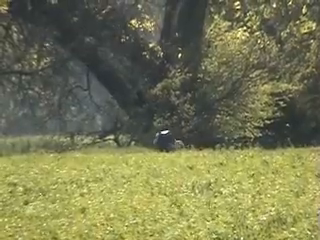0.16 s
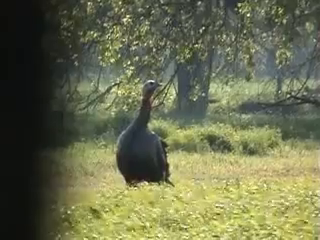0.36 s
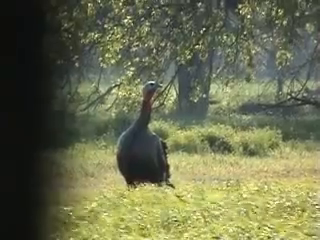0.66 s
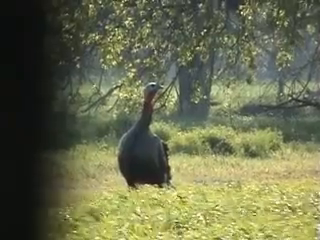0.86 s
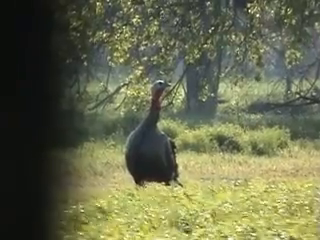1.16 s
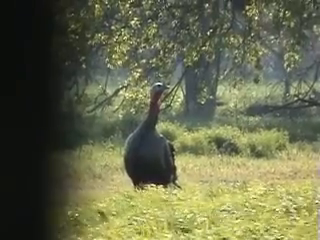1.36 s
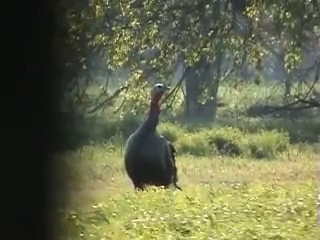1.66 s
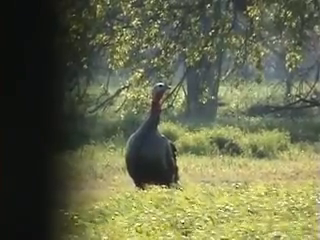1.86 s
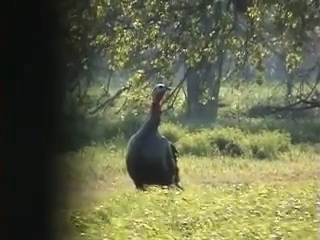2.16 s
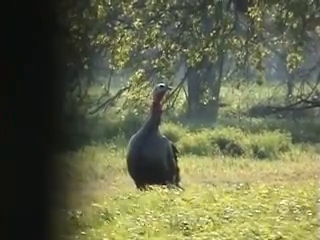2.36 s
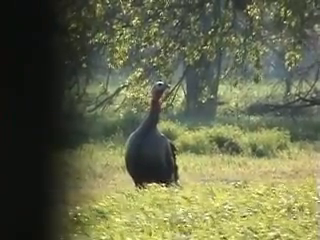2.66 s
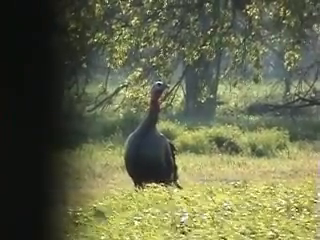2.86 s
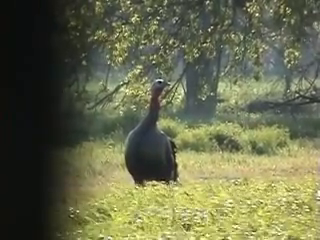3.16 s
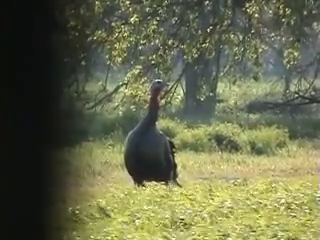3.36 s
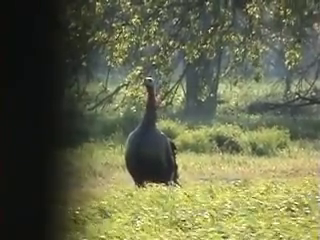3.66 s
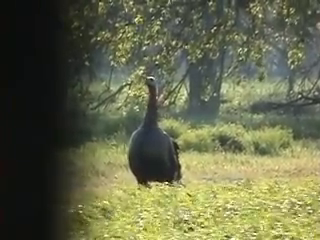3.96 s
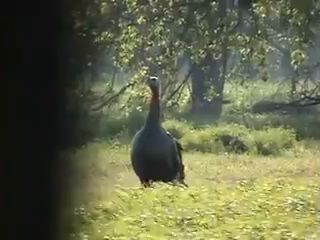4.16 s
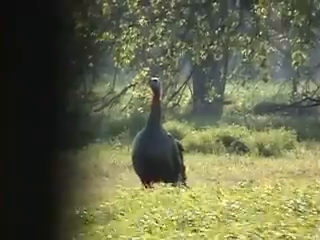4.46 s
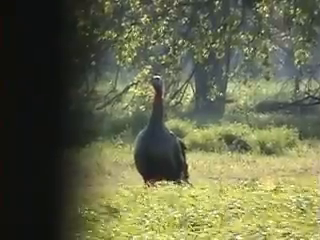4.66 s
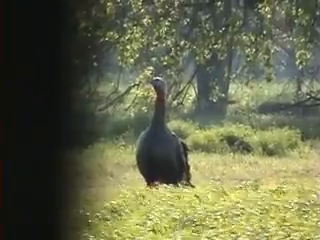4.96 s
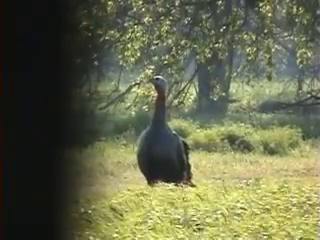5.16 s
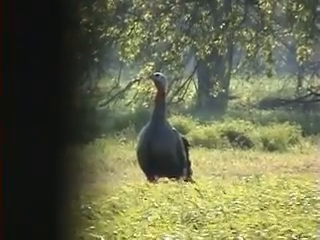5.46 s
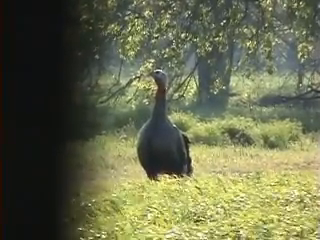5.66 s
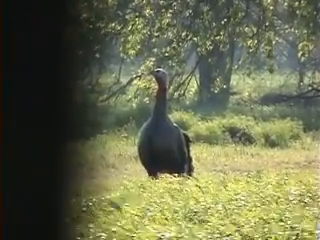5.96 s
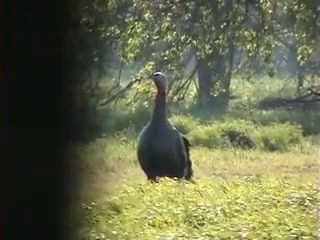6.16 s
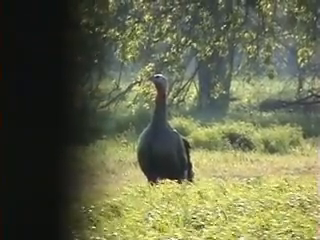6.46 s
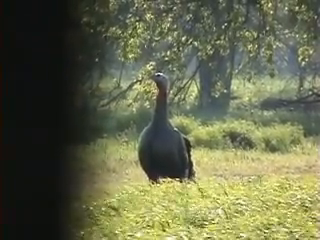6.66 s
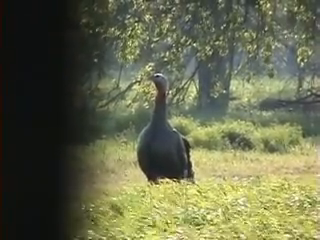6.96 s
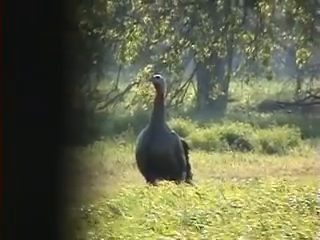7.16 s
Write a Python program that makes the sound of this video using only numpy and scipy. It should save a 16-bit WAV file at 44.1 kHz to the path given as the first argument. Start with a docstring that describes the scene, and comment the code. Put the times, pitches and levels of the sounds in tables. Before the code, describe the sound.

Low camera bumps and rubs, a few clicks, then a turkey's rough stuttering notes break into eight loud reedy two-toned yelps outdoors.

```python
"""In an open field a wild turkey gives three scratchy notes, then eight loud yelps.
Each yelp cracks down from a squeak into a held reedy tone, and cracks up again as it ends.
The calls are gliding partials plus puffs of noise, shaped by throat resonances and scattered by the field.
A handled camera adds noise rubs, decaying low knocks, ringing clicks and the pulses of its faint motor.
Around them lie shaped-noise hiss, outdoor air and breeze, and a few far songbirds whistling in sines."""
import sys
import numpy as np
from scipy import signal
from scipy.fft import rfft, irfft, next_fast_len
from scipy.io import wavfile
from scipy.ndimage import uniform_filter1d, minimum_filter1d

SR = 44100
rng = np.random.default_rng(int(sys.argv[2]) if len(sys.argv) > 2 else 0)


def output_pcm(signal):
    """Save a mono or channel-first signal as 16-bit PCM at the path in sys.argv[1].

    Samples are clipped to [-1, 1] before scaling.
    """
    pcm = np.clip(np.atleast_2d(signal).T, -1, 1) * 32767
    wavfile.write(sys.argv[1], SR, np.round(pcm).astype(np.int16))


N = 322723


def gain_of(db):
    """Decibels to amplitude."""
    return 10 ** (np.asarray(db) / 20)


def evened(x):
    """Scales to rms 1."""
    return x / np.sqrt(np.mean(x ** 2) + 1e-20)


def spectrum_gain(points, hz):
    """A spectrum's gain at the given frequencies, read along a log frequency axis."""
    point_hz, point_db = np.transpose(points)
    return gain_of(np.interp(np.log(hz + 1), np.log(point_hz + 1), point_db))


def level_curve(points):
    """A dB curve over time as a gain for every sample."""
    return gain_of(np.interp(np.arange(N) / SR, *np.transpose(points)))


def add(mix, start_s, sound):
    """Mixes a sound in at its start time, cut off at the end of the scene."""
    part = mix[..., max(0, round(start_s * SR)):][..., :sound.shape[-1]]
    part += sound[..., :part.shape[-1]]


def coloured(x, spectrum):
    """Gives x a spectrum, at rms 1."""
    n = x.shape[-1]
    size = next_fast_len(n + 512)
    gain = spectrum_gain(spectrum, np.fft.rfftfreq(size, 1 / SR))
    return evened(irfft(rfft(x, size) * gain, size)[..., :n])


def wander(n, hz):
    """Smooth random drift of about rms 1, moving mostly slower than hz."""
    size = next_fast_len(n + 1024)
    soft = np.exp(-(np.fft.rfftfreq(size, 1 / SR) / hz) ** 2)
    return evened(irfft(rfft(rng.standard_normal(size)) * soft, size))[:n]


def pair(n, likeness):
    """Left and right noise with a given correlation."""
    left, other = rng.standard_normal((2, n))
    c = np.clip(likeness, -1, 1)
    return np.array([left, c * left + np.sqrt(1 - c * c) * other])


def fade(n, rise_s, fall_s):
    """Soft sine-shaped start and end."""
    t = np.arange(n) / SR
    fade_in = np.sin(np.pi / 2 * np.clip(t / rise_s, 0, 1))
    fade_out = np.sin(np.pi / 2 * np.clip((t[-1] - t) / fall_s, 0, 1))
    return fade_in * fade_out


# loudness of the hiss and of the outdoor air: time_s, level_db
HISS_LEVEL = [(0, -49.5), (.26, -50), (.3, -58), (1.2, -60), (2.1, -60), (3.2, -62.5), (5.6, -66),
              (6.5, -63), (7.32, -60)]
AIR_LEVEL = [(0, -50.5), (.26, -52.5), (.32, -54.5), (2.1, -55), (4.2, -57.5), (5.7, -59.5), (6.5, -57),
             (7.32, -50.5)]
# their colours: frequency_hz, relative_db (per Hz)
HISS = [(1060, -21), (1800, -0.5), (2210, 1), (2700, -1.5), (3650, -3.5), (4240, -4.5), (6160, -5),
        (6670, -8), (10900, -12.5), (12000, -29), (15600, -60), (22000, -120)]
AIR = [(25, -11), (70, 0), (140, -11.5), (250, -5.5), (420, 2.5), (700, -4.5), (1200, -6), (2000, -34),
       (3500, -32.5)]
# loudness of the camera motor: time_s, level_db
MOTOR_LEVEL = [(0, -86), (.3, -60.5), (.55, -60), (1.3, -66), (2.2, -64.5), (5.6, -74), (7.32, -69)]
# colour of its buzz: frequency_hz, relative_db
MOTOR = [(300, -6.5), (1500, 0), (2100, 0), (3300, -10.5), (4200, -11.5), (5100, 1), (5700, -2.5),
         (6400, -12), (7500, -11), (11000, -14)]
MOTOR_HZ = 299.7  # pulses per second


def background():
    """Nearly unrelated hiss, swelling air shared by both sides, and a motor buzzing in regular pulses."""
    hiss = coloured(pair(N, 0.055), HISS) * level_curve(HISS_LEVEL)
    swell = gain_of(1.15 * wander(N, 8.7))
    air = coloured(pair(N, 0.82), AIR) * level_curve(AIR_LEVEL) * swell
    turns = np.cumsum(MOTOR_HZ * (1 + 0.00052 * wander(N, 8))) / SR
    pulses = np.diff(np.floor(turns), prepend=0)  # one pulse at each full turn
    buzz = coloured(pulses - pulses.mean(), MOTOR) * level_curve(MOTOR_LEVEL)
    return hiss + air + buzz


# loudness of the low breeze on the microphones: time_s, level_db
BREEZE_LEVEL = [(0, -53), (2.5, -46), (3.6, -46.5), (5.1, -65), (5.9, -58.5), (6.25, -40), (6.75, -50),
                (7, -67), (7.32, -68)]
# colour of the breeze: frequency_hz, relative_db (per Hz)
BREEZE = [(20, -10), (45, -7.5), (90, 2.5), (140, 0.5), (220, -15.5), (500, -39.5), (1500, -74)]


def breeze(gust_db=4):
    """Low lumpy puffs of air, unrelated at the two microphones."""
    gusts = evened(gain_of(gust_db * wander(N, 17)))
    return coloured(pair(N, 0), BREEZE) * gusts * level_curve(BREEZE_LEVEL)


# knocks on the camera body: start_s, relative_level_db
KNOCKS = [(0.271, -9), (0.477, -7.5), (0.538, -10), (0.819, -15), (0.926, -12.5), (1.001, -15.5),
          (1.04, -11), (1.119, -13), (1.177, -12), (1.325, -10.5), (1.38, -16.5), (1.509, -14.5),
          (1.584, -11), (1.695, -12), (2.014, -17.5), (2.552, -12), (2.862, -15.5), (3.716, -18),
          (4.507, -15.5), (6.096, -21), (6.161, -25.5), (6.229, -27), (6.309, -25), (6.372, -28.5),
          (6.559, -20)]


def knocks(trim_db=-1.5, centre_hz=200, thud_t60_s=0.038, tick_db=-7, tick_t60_s=0.026):
    """Each knock rocks the body in a short decaying thud, tuned apart on each side, with a dull tick."""
    out = np.zeros((2, N))
    t = np.arange(SR // 12) / SR
    tick_colour = [(120, -27.0), (400, 6.0), (650, -12.0), (1200, -18.5), (2000, -34.0), (4000, -46)]
    for start_s, db in KNOCKS:
        hz = centre_hz * 2 ** rng.uniform(-0.74, 0.52, (2, 1))  # random octaves off centre
        phase = rng.random((2, 1))
        thud = np.sin(2 * np.pi * (hz * t + phase)) * gain_of(-60 * t / thud_t60_s)
        tick = coloured(pair(len(t), 0.24), tick_colour) * gain_of(tick_db - 60 * t / tick_t60_s)
        add(out, start_s, gain_of(db + trim_db) * (thud + tick) * fade(len(t), 0.0037, .01))
    return out


# strokes of the hand on the camera: start_s, length_s, rise_s, relative_level_db
RUBS = [(0.274, 0.069, 0.0076, -18.5), (0.355, 0.11, 0.0073, -25.5), (0.474, 0.071, 0.0046, -20.5),
        (0.647, 0.072, 0.028, -18), (0.817, 0.056, .005, -17.5), (0.922, 0.086, 0.0087, -29),
        (1.037, 0.15, 0.008, -25), (1.284, 0.084, 0.019, -24), (1.463, 0.092, 0.055, -24),
        (1.58, 0.027, .005, -27.5), (1.629, .14, 0.047, -20.5), (1.836, 0.1, 0.041, -24),
        (1.996, 0.02, 0.013, -30), (2.097, 0.28, 0.078, -26), (2.448, 0.13, .025, -27.5),
        (2.586, .09, .02, -34), (2.761, 0.094, 0.085, -24), (2.966, 0.14, 0.033, -35),
        (3.176, 0.016, .015, -39), (3.332, 0.065, 0.016, -41), (3.475, 0.11, .09, -38.5),
        (3.682, 0.064, 0.027, -33), (3.808, 0.036, 0.018, -39.5), (3.928, 0.038, .025, -39.5),
        (4.314, 0.036, .025, -47), (4.458, 0.071, 0.055, -31.5), (6.06, 0.13, 0.026, -37),
        (6.204, 0.043, 0.026, -27.5), (6.271, 0.12, 0.016, -34.5), (6.531, 0.035, 0.027, -25.5),
        (6.705, 0.13, 0.022, -47), (6.85, 0.37, .02, -61)]
RUB_FALL_DB_PER_S = 650.5


def strokes():
    """Strength of the rubbing: each stroke takes hold, lasts, and dies away."""
    out = np.zeros(N)
    for start_s, length_s, rise_s, db in RUBS:
        t = np.arange(0, length_s + .1, 1 / SR)
        fall_db = RUB_FALL_DB_PER_S * np.maximum(t - length_s, 0)
        add(out, start_s, np.minimum(t / rise_s, 1) * gain_of(db - fall_db))
    return out


# colour the camera case gives to rubbing: frequency_hz, relative_db (per Hz)
CASE = [(25, -36.5), (60, -15), (90, -8.5), (145, 1), (260, -1.5), (420, -11), (740, -25), (1150, -30),
        (1650, -41.5), (2500, -56.5), (4000, -89)]


def rubbing(trim_db=-1.0, lumpy_db=2, slips_per_s=900, smooth_db=-8):
    """The hand sticks and slips on the case: sparse noise spikes over smooth noise, partly opposed in stereo."""
    slipping = rng.random(N) < slips_per_s / SR
    friction = evened(pair(N, -0.5) * slipping) + gain_of(smooth_db) * pair(N, -0.18)
    grip = evened(gain_of(lumpy_db * wander(N, 41)))
    return coloured(friction, CASE) * grip * strokes() * gain_of(trim_db)


# sharp plastic clicks: start_s, relative_level_db, treble_db
CLICKS = [(0.886, -35, -25), (1.0412, -41, 0.5), (1.324, -23.5, 3.5), (2.4345, -37.5, -18),
          (2.5019, -28, 1), (2.829, -26, 5.5), (4.171, -49, -3), (4.964, -61, -15), (7.1798, -33.5, -31)]
# ringing modes of the plastic: frequency_hz, relative_level_db, t60_s
PLASTIC = [(1150, -17, 0.0343), (1824, 14.5, 0.027), (3370, -9, .03), (3420, 2, 0.046), (7190, 1.5, 0.051),
           (7860, -5, 0.039), (9240, -11, 0.043)]


def clicks(crack_t60_s=0.02, ring_db=-17, trim_db=-4, rattle_db=-19, rattle_t60_s=0.19):
    """A brief noise crack with a longer rattle, and decaying sines for the ringing plastic case."""
    out = np.zeros((2, N))
    t = np.arange(SR // 8) / SR
    decay = gain_of(-60 * t / crack_t60_s) + gain_of(rattle_db - 60 * t / rattle_t60_s)
    snap_colour = [(500, 8), (1850, -2.0), (2600, -14), (3500, 1.0), (5000, -11.0), (7800, -2), (12000, -27.5)]
    lowpass = signal.butter(1, 3000, fs=SR, output="sos")
    for start_s, db, treble_db in CLICKS:
        snap = coloured(pair(len(t), 0.89), snap_colour)
        ring = sum(gain_of(mode_db - 60 * t / t60_s) * np.sin(2 * np.pi * (hz * t + rng.random((2, 1))))
                   for hz, mode_db, t60_s in PLASTIC)
        click = snap * decay + gain_of(ring_db) * ring
        # each click has its own share of treble
        body = signal.sosfilt(lowpass, click)
        add(out, start_s, gain_of(db + trim_db) * (body + gain_of(treble_db) * (click - body)))
    return out


# higher partials against the low ones combined, before brightness and waver: frequency_hz, relative_db
OVERTONES = [(1750, -16.5), (2250, -15), (2850, -23), (3400, -33.5), (4400, -37.5), (5200, -47.5),
             (8000, -53.5)]
# air rushing through the throat: frequency_hz, relative_db (per Hz)
THROAT = [(250, -32.5), (520, -42), (850, 4), (1300, 5), (1750, 3), (2100, -8.5), (2900, -18),
          (3600, -27.5), (6000, -48), (11000, -39)]


def syrinx(hz, partials, rasp, bright_db=0, jitter=0.075, shimmer=0.043, air_db=-4, leak=0.057,
           waver_db=3, tremble=.18):
    """A membrane that beats cleanly, or unevenly with puffs of air when it rasps."""
    n, rasp = len(hz), np.clip(rasp, 0, 1)
    t = np.arange(n) / SR
    turns = np.cumsum(hz * (1 + (0.0027 + jitter * rasp) * wander(n, 316))) / SR
    strength = np.sqrt(np.sum(np.square(partials), axis=0))
    heights = list(partials)
    for k in range(len(partials) + 1, 14):
        # each overtone swells and fades on its own within a call
        swell = np.sin(2 * np.pi * (rng.uniform(11, 12) * t + rng.random()))
        waver = gain_of(bright_db + waver_db * swell)
        # the higher an overtone, the more it trembles
        grain = 1 + tremble * np.log2(k / 2) * wander(n, 250)
        heights.append(strength * spectrum_gain(OVERTONES, k * hz) * waver * grain)
    tone = sum(height * np.cos(2 * np.pi * (k * turns + rng.random()))
               for k, height in enumerate(heights, 1))
    tone *= np.sqrt(2 - rasp ** 2) * (1 + shimmer * rasp * wander(n, 190))
    # the air comes in puffs, in step with the beats
    puffs = coloured(rng.standard_normal(n) * (1 + 0.54 * np.cos(2 * np.pi * turns)), THROAT)
    return tone + gain_of(air_db) * (rasp + leak) * strength * puffs


# how strongly the throat sounds a low partial as it glides through: frequency_hz, gain_db
RESONANCES = [(515, -18), (560, -8), (620, -12), (700, -9.5), (800, -2), (930, 1), (1000, -2.5),
              (1075, -27), (1130, -19), (1210, 0), (1320, -5.5), (1450, 1.5), (1600, 0), (1760, -4.5),
              (1860, -24), (2000, -11.5)]


def throat(hz, count=2, notch_hz=1643, notch_width_hz=26, notch_db=-17):
    """Gains of the lowest partials of a pitch: broad resonances with one narrow dead spot."""
    partial_hz = np.arange(1, count + 1)[:, None] * hz
    off = ((partial_hz - notch_hz) / notch_width_hz) ** 2
    notch = np.sqrt((off + gain_of(notch_db) ** 2) / (off + 1))
    return spectrum_gain(RESONANCES, partial_hz) * notch


STUTTER_PER_S = 30.3  # pulses per second


def note(curve, bright_db=-4, rise_s=0.0044, fall_s=0.0077, gap_shape=1.4, lead_s=0.0011):
    """A scratchy note along a drawn curve; where it stutters, the voice is chopped into even pulses."""
    time_s, *columns = np.transpose(curve)
    t = np.arange(time_s[0], time_s[-1], 1 / SR)
    hz, db, rasp, stutter = (np.interp(t, time_s, column) for column in columns)
    gaps = abs(np.cos(np.pi * STUTTER_PER_S * (t - t[0] + lead_s))) ** gap_shape
    chop = 1 - np.clip(stutter, 0, 1) * gaps
    voice = syrinx(hz, throat(hz) * gain_of(db) * chop, rasp, bright_db)
    return t[0], voice * fade(len(t), rise_s, fall_s)


def crack(start_s, length_s, start_hz, end_hz, db, rasp, fundamental_db=0, rise_s=0.0021, fall_s=0.0036,
          arch=0.58, bright_db=-4):
    """A short glide of the voice: the vibration builds up, arches and dies away with soft edges."""
    t = np.arange(-.015, length_s + .02, 1 / SR)
    along = np.clip(t / length_s, 0, 1)
    onset = 1 / (1 + np.exp(-t / rise_s))
    release = 1 / (1 + np.exp((t - length_s) / fall_s))
    swell = (1 + arch * (np.sin(np.pi * along) - .5)) * onset * release
    hz = start_hz + (end_hz - start_hz) * along
    partials = throat(hz) * gain_of([[db + fundamental_db], [db]]) * swell
    return start_s + t[0], syrinx(hz, partials, rasp, bright_db)


# the held pitch sags from top to low, and is drawn towards its end pitch just before it stops
SAG_S, TIGHTEN_S = 0.013, .04
# in a softer yelp the two lowest partials follow the level only by this share, about a full yelp's level
DULL_SHARE, FULL_DB = 0.26, -13
# change of the first, second and third partial once the membrane loosens: change_db
LOOSE_DB = [-2, 4, -2.5]


def held(start_s, length_s, top_hz, low_hz, end_hz, db, change_db, sag_at_s, loosen_s, overlap_s=0.0045,
         settle_s=.009, first_rasp=.45, last_rasp=0.34, loosen_edge_s=.004, rise_s=.01, fall_s=.009):
    """The held tone: raspy as the membrane settles, then clean, then raspy again as it lets go."""
    t = np.arange(-overlap_s, length_s + overlap_s, 1 / SR)
    hz = low_hz + (top_hz - low_hz) / (1 + np.exp((t - sag_at_s) / SAG_S))
    hz = hz + (end_hz - low_hz) * np.exp(-((t[-1] - t) / TIGHTEN_S) ** 2)
    loose = .5 + .5 * np.tanh((t - length_s + loosen_s) / loosen_edge_s)
    rasp = first_rasp * np.exp(-(t - t[0]) / settle_s) + last_rasp * loose
    effort_db = db + change_db * t / length_s
    soft_db = FULL_DB + DULL_SHARE * (effort_db - FULL_DB)
    partials_db = [soft_db, soft_db, effort_db] + np.outer(LOOSE_DB, loose)
    voice = syrinx(hz, throat(hz, count=3) * gain_of(partials_db), rasp)
    return start_s + t[0], voice * fade(len(t), rise_s, fall_s)


# pitch glides between the registers: the drop falls, the lift climbs
DROP_FROM_HZ, DROP_TO_HZ, LIFT_FROM_HZ, LIFT_TO_HZ = 790, 606, 595.6, 616.8
# a jump of pitch this quick is all rasp; slower ones are cleaner
JUMP_S = 0.0068


def yelp(row, slide_hz_per_s=2800, squeak_rasp=0.44, drop_thin_db=-7, lift_thin_db=-8, lift_arch=.05,
         tail_s=0.019, tail_fall_s=.0055, tail_lead_s=.003, tail_rasp=0.45):
    """A squeak drops into the held tone, which lifts at its end and cracks up into a softer squeak."""
    start_s, squeak_s, drop_s, hold_s, lift_s = row[:5]
    squeak_hz, top_hz, low_hz, end_hz, tail_hz = row[5:10]
    squeak_db, drop_db, hold_db, change_db, lift_db, tail_db, sag_at_s, loosen_s = row[10:]
    drop_at, hold_at, lift_at, tail_at = start_s + np.cumsum([squeak_s, drop_s, hold_s, lift_s])

    def squeak(at_s, length_s, hz, db, rasp, **shape):
        """The high register, sliding down a little."""
        slide_hz = slide_hz_per_s * length_s / 2
        return crack(at_s, length_s, hz + slide_hz, hz - slide_hz, db, rasp, **shape)

    # between the registers the fundamental thins out
    return [squeak(start_s, squeak_s, squeak_hz, squeak_db, squeak_rasp),
            crack(drop_at, drop_s, DROP_FROM_HZ, DROP_TO_HZ, drop_db, JUMP_S / drop_s, drop_thin_db),
            held(hold_at, hold_s, top_hz, low_hz, end_hz, hold_db, change_db, sag_at_s, loosen_s),
            crack(lift_at, lift_s, LIFT_FROM_HZ, LIFT_TO_HZ, lift_db, JUMP_S / lift_s, lift_thin_db,
                  arch=lift_arch),
            squeak(tail_at - tail_lead_s, tail_s, tail_hz, tail_db, tail_rasp, fall_s=tail_fall_s)]


def field(x, t60_s=0.09, far_t60_s=0.13, far_db=-27):
    """Quick scatter from ground and leaves, and a faint wash from the trees, as decaying noise echoes."""
    t = np.arange(SR // 2) / SR
    decay = gain_of(-60 * t / t60_s) + gain_of(far_db - 60 * t / far_t60_s)
    tail = rng.standard_normal((2, len(t))) * decay * (t > .002)
    return signal.fftconvolve(x[None], tail / np.linalg.norm(tail[0]), axes=1)[:, :N]


# three scratchy notes, a curve each: time_s, pitch_hz, relative_level_db, rasp (0-1), stutter (0-1)
NOTES = [
    [(1.718, 586.4, -16, 0.34, 0.6), (1.765, 630.4, -15, 0.72, 0.84), (1.812, 614, -15, 0.46, 0.91),
     (1.822, 794, -18, 0.48, 0.8), (1.866, 793.5, -16.5, 1, 0.77), (1.905, 769, -16.5, .45, 0.73),
     (1.93, 782, -20, .08, 0), (1.972, 809, -22.5, 0, 0.03), (2.0, 917, -24.5, 0.25, 0)],
    [(2.211, 667, -18.5, 0.06, 0.1), (2.223, 615, -31, 0, 0.1), (2.225, 945, -25, .1, 0),
     (2.234, 923, -13.5, 0.01, 0.15), (2.266, 880, -35.5, 0.24, 1), (2.29, 658, -24.5, 0.37, 0.4),
     (2.321, 712, -22.5, 0, 0), (2.334, 897, -28.5, .25, 0.1), (2.346, 950, -36, .25, 0.1)],
    [(2.563, 994, -13.5, 0.14, 0), (2.575, 887, -16, 0.1, 0.4), (2.581, 737.6, -7.5, 0.32, 0.3),
     (2.596, 638, -15, 0.84, 0.04), (2.609, 606.5, -14, 0.37, 0), (2.634, 679.6, -15, 1, 0),
     (2.655, 609, -13, 0.27, 0), (2.675, 707, -22, 0.87, 0), (2.718, 812, -42, 0.2, 0.2)],
]
# one row per yelp; the tail is its closing squeak, levels are before the throat's resonances:
# start_s, squeak_s, drop_s, hold_s, lift_s, squeak_hz, top_hz, low_hz, end_hz, tail_hz,
# squeak_db, drop_db, hold_db, change_db (over the hold), lift_db, tail_db,
# sag_at_s (into the hold), loosen_s (rasp at its end)
YELPS = [(2.917, .016, 0.013, 0.11, 0.011, 833, 536.6, 518, 537, 995, -11, -10.5, -12.5, -3, -12, -22, 0.044, 0.011),
         (3.251, .019, 0.0068, 0.14, 0.011, 947, 579.7, 533.8, 547.7, 928, -8, -10.5, -10.5, -1, -13, -29, 0.046, 0.01),
         (3.597, 0.015, 0.011, 0.15, .011, 960, 576.6, 556.3, 550.6, 967, -6, -8.5, -11.5, -3, -11.5, -30, 0.052, 0.021),
         (3.944, .013, 0.0083, 0.15, 0.012, 965, 586.5, 554.8, 587, 899, -8.5, -5.5, -12, 1, -11.5, -24, 0.039, 0.028),
         (4.293, .025, 0.0099, 0.15, .011, 875, 583.4, 555, 566, 922, -15, -6, -11.5, -1, -12.5, -25, 0.053, 0.019),
         (4.658, .007, .014, 0.12, 0.037, 886, 588, 570.7, 582, 929, -10, -10, -13, 3.5, -9.5, -32, .03, .012),
         (5.008, .012, .010, 0.14, 0.0096, 931, 579.7, 537.5, 562.4, 891, -14, -13, -13, 0.5, -9.5, -25, .038, 0.034),
         (5.347, .015, .022, 0.096, .008, 930, 589, 529, 531, 858, -24, -8.5, -17, -9, -19, -17.5, 0.048, 0.011)]
# the voice at the right microphone, against the left: frequency_hz, gain_db
RIGHT = [(560, -1), (950, -3.5), (1250, -4), (1700, -5.5), (2250, -13.5), (2900, -6.5), (4000, -5),
         (6000, -2), (11000, -7)]
# its delay there: frequency_hz, lag_rad
RIGHT_LAG = [(500, -0.42), (1720, 0.87), (2150, 0.65), (2760, -0.46), (3450, 1), (5600, -0.7)]
FLUTTER_HZ = 3900  # rate of the flutter that gives the calls their metallic edge


def turkey(voice_db=1.0, scatter_db=-20, metal_db=(-26, -28, -33), fizz_db=-38):
    """All the calls, a little to the left, with a faint metallic edge and the field's scatter."""
    voice = np.zeros(N)
    for curve in NOTES:
        add(voice, *note(curve))
    for row in YELPS:
        for part in yelp(row):
            add(voice, *part)
    # noise that follows the voice adds a little fizz
    fizz_colour = [(1500, -11.0), (4000, -5), (7000, 4.5), (12000, 4), (14000, -28)]
    fizz = gain_of(fizz_db) * voice * coloured(pair(N, 0.36), fizz_colour)
    # a weak fast flutter mirrors the voice into the treble
    turns = FLUTTER_HZ * np.arange(N) / SR
    flutter = sum(gain_of(db) * np.cos(2 * np.pi * k * turns) for k, db in enumerate(metal_db, 1))
    voice = voice + flutter * signal.sosfilt(signal.butter(1, 900, "high", fs=SR, output="sos"), voice)
    # the right side has its own colour and phase
    size = next_fast_len(N)
    hz = np.fft.rfftfreq(size, 1 / SR)
    lag = np.exp(-1j * np.interp(hz, *np.transpose(RIGHT_LAG)))
    right = irfft(rfft(voice, size) * spectrum_gain(RIGHT, hz) * lag, size)[:N]
    direct = gain_of(voice_db) * np.array([voice, right])
    return direct + fizz + gain_of(scatter_db) * field(voice)


# far songbirds: start_s, length_s, pitch_hz, level_db
WHISTLES = [(5.723, 0.053, 3980, -75), (6.555, 0.21, 2223, -70.5), (6.83, 0.083, 4760, -74),
            (7.067, 0.28, 2670, -75)]


def songbirds(quaver=0.0035):
    """Thin whistles from far off in the trees: slightly quavering sines that swell and fade."""
    out = np.zeros(N)
    for start_s, length_s, hz, db in WHISTLES:
        n = int(length_s * SR)
        turns = np.cumsum(hz * (1 + quaver * wander(n, 57))) / SR
        add(out, start_s, gain_of(db) * evened(np.hanning(n) * np.sin(2 * np.pi * turns)))
    return out


def scene():
    """The background, the handled camera and the birds."""
    return background() + breeze() + knocks() + rubbing() + clicks() + turkey() + songbirds()


EDGE_HZ = 11850  # top of the audible band


def record(dry, limit_db=-5, slope=1.0):
    """A fast limiter evens out the loudest peaks; then a lowpass sets the band limit."""
    peak = -minimum_filter1d(-abs(dry).max(axis=0), size=200)
    over_db = np.maximum(20 * np.log10(peak + 1e-9) - limit_db, 0)
    limited = dry * gain_of(-np.clip(slope, 0, 1) * uniform_filter1d(over_db, size=120))
    lowpass = signal.firwin(301, EDGE_HZ, window=("kaiser", 9), fs=SR)
    return signal.oaconvolve(limited, lowpass[None], "same")


dry = scene()
out = record(dry)
output_pcm(out)
```